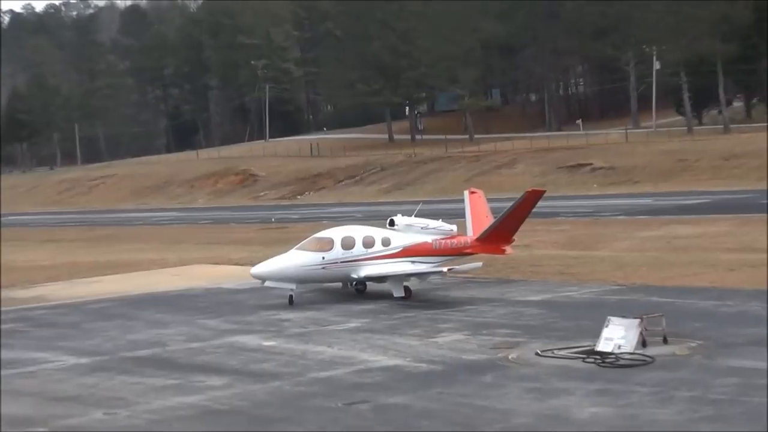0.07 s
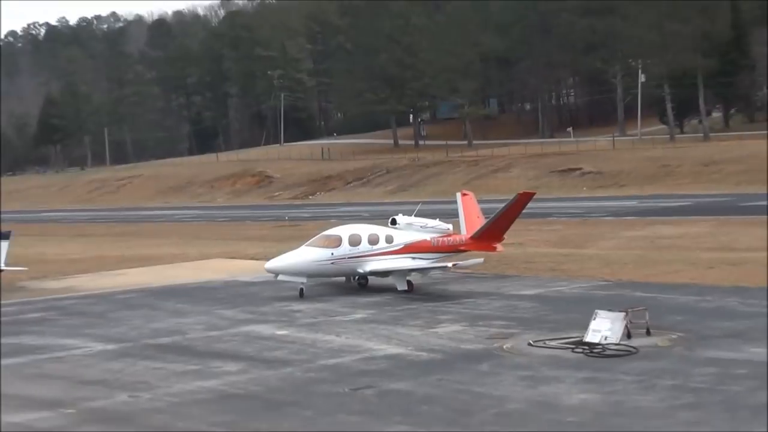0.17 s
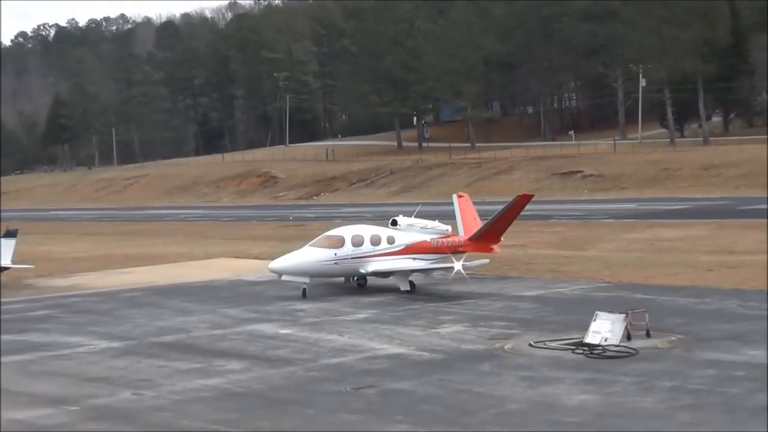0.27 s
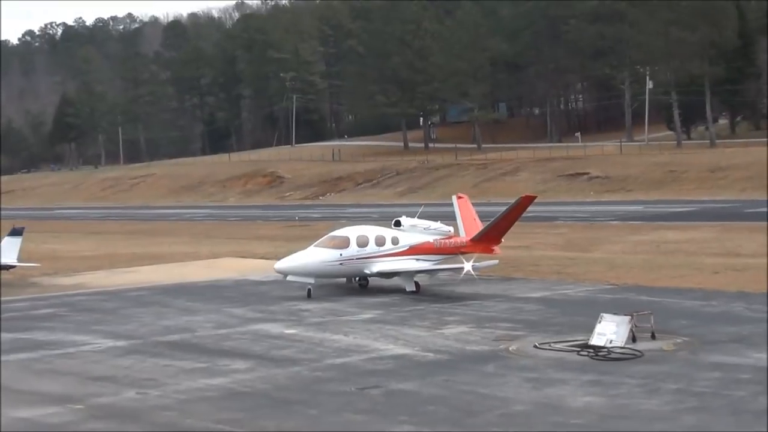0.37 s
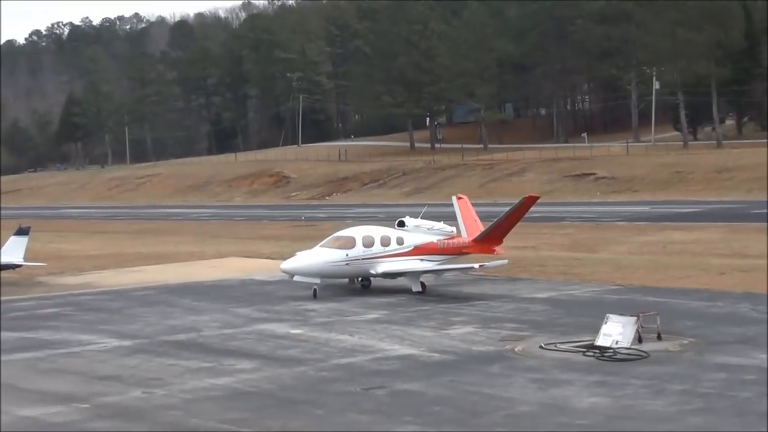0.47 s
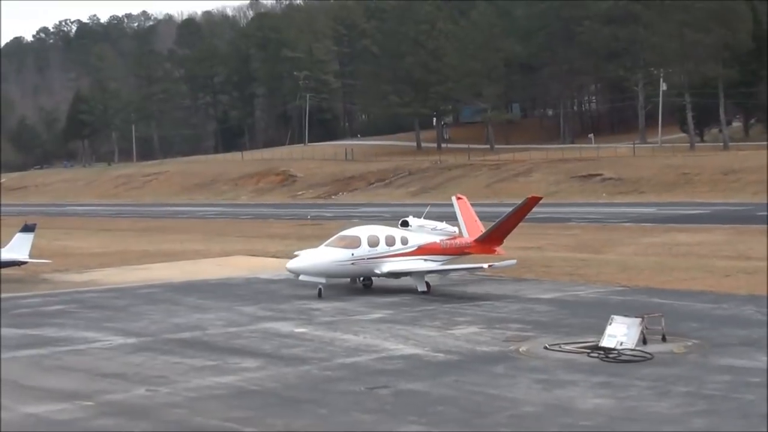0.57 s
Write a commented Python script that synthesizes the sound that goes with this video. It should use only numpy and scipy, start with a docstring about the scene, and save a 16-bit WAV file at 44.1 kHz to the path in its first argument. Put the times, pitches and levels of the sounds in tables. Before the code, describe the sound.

Small jet engine whining and rushing on an open ramp, fading in, then spooling up higher

```python
"""A small turbofan jet taxis across a concrete ramp; the sound fades in, then the engine spools up. The fan
sings in sine tones at orders of its shaft speed, and the core adds a whine and a difference tone below it. The
broad rush of intake and exhaust is stereo noise in bands that swell on their own, coloured by a short echo off
the airframe, a later one off the ground and that echo once more. The tones swell and fade as eddies in the air
between jet and microphones add stray paths."""
import sys
import numpy as np
from scipy import signal
from scipy.fft import rfft, irfft, next_fast_len
from scipy.io import wavfile
from scipy.ndimage import uniform_filter1d, map_coordinates

SR = 44100
rng = np.random.default_rng(int(sys.argv[2]) if len(sys.argv) > 2 else 0)


def store_wav(level_fs):
    """Save 16-bit WAV to argv[1]."""
    pcm = np.round(np.clip(np.atleast_2d(level_fs), -1, 1) * 32767)
    wavfile.write(sys.argv[1], SR, pcm.T.astype(np.int16))


N = 97637

# How alike the left and right sides are. Each row: frequency in Hz, correlation from 0 to 1.
SIDE_LIKENESS = [(30, .995), (160, .97), (450, 0.94), (1220, 0.88), (2010, 0.89), (3330, 0.66),
                 (5500, 0.57), (9080, 0.87), (11500, 1)]
# How the sound leans to the left. Each row: frequency in Hz, level of left over right in dB.
LEFT_LEAN = [(60, 0), (200, -.5), (450, 1), (740, 2.5), (1220, 3), (3330, 2), (5500, 3), (9080, .5),
             (11500, 0)]
# How far the left side leads the right. Each row: frequency in Hz, phase in radians.
LEFT_LEAD = [(30, 0), (200, -0.27), (690, -0.43), (2300, .1), (2700, 0.27), (3900, -0.085), (6100, -0.41),
             (9200, -0.43), (11500, 0)]
SIDES = np.array([[1], [-1]])   # left, right


def amp(db):
    """Decibels to gain."""
    return 10 ** (np.asarray(db) / 20)


def in_time(rows):
    """Columns of a table, after its first in seconds, as curves over the samples."""
    seconds, *columns = np.transpose(rows)
    t = np.arange(N) / SR
    return [np.interp(t, seconds, column) for column in columns]


def at_hz(points, hz):
    """Table value on a log-frequency axis."""
    point_hz, values = np.transpose(points)
    return np.interp(np.log(hz + 1), np.log(point_hz + 1), values)


def drift(rate_hz):
    """Slow noise of spread 1: white noise through two equal low-pass poles at the given rate."""
    step = 40   # samples between the slow values
    pole = np.exp(-2 * np.pi * rate_hz * step / SR)
    noise = rng.standard_normal(N // step + 2002)
    slow = signal.lfilter([1], [1, -2 * pole, pole * pole], noise)[2000:]   # past the settling
    return np.interp(np.arange(N) / step, np.arange(len(slow)), slow / slow.std())


def band_swells(sides, size, roar_db, rumble_db):
    """Third-octave bands of the rush swell separately, with a little swell in common."""
    own_swell_db, shared_swell_db = 1.5, 0.42
    roar_low_hz, roar_high_hz = 500, 2100
    hz = np.arange(size // 2 + 1) * SR / size
    place = 3 * np.log2(np.maximum(hz, 50) / 50)   # third-octaves above 50 Hz
    together = drift(6)
    out = 0
    for k in range(26):
        share = np.cos(np.pi / 2 * np.clip(place - k, -1, 1)) ** 2   # overlaps its neighbours
        centre_hz = 50 * 2 ** (k / 3)
        swell_db = shared_swell_db * together + own_swell_db * drift(11.6)
        if centre_hz < roar_low_hz:
            swell_db = swell_db + rumble_db
        elif centre_hz < roar_high_hz:
            swell_db = swell_db + roar_db
        out = out + amp(swell_db) * irfft(sides * share, size)[:, :N]
    return out


def ground_echoes(direct):
    """The ground returns a dulled copy, then once more at twice the lag, which shifts as the jet rolls."""
    # Delay of the first ground echo. Each row: time in seconds, delay in ms.
    ground_delay = [(.1, 4.25), (.5, 4.35), (.9, 4.65), (1.3, 4.8), (1.7, 4.72), (2.2, 4.4)]
    echo_gain, rebound_gain, dull_hz = 0.5, 0.24, 3240
    low_pass = signal.butter(1, dull_hz, fs=SR, output="sos")
    dull = signal.sosfiltfilt(low_pass, direct)
    lag = uniform_filter1d(in_time(ground_delay)[0], size=6000) * SR / 1000   # ms to samples
    out = direct
    for bounce, gain in ((1, echo_gain), (2, rebound_gain)):
        late = np.arange(N) - bounce * lag
        echo = [map_coordinates(side, [late], order=3, mode="nearest") for side in dull]
        out = out + gain * np.array(echo)
    return out


def rush(rush_db, roar_db, rumble_db):
    """Intake and exhaust turbulence: coloured stereo noise with echoes off the airframe and the ground."""
    # Colour of the rush before its echoes. Each row: frequency in Hz, relative level in dB per Hz.
    rush_colour = [(20, -47), (100, -31.5), (155, -15), (200, -22), (280, -18.5), (330, -9), (450, -18.5),
                   (560, -21), (615, -15), (740, -19), (880, -14.5), (1050, -12.5), (1280, -15), (1480, -6),
                   (1750, -11.5), (2050, -14.5), (2500, -11), (3300, -11.5), (4500, -15), (6500, -16.5),
                   (8000, -18.5), (10500, -16.5), (12500, -24), (14000, -30.5), (15600, -31)]
    near_echo_s, near_echo_gain, near_dull_hz = 0.001225, 0.3, 4660   # off the airframe
    size = next_fast_len(N)
    hz = np.arange(size // 2 + 1) * SR / size
    common, opposed = rfft(rng.standard_normal((2, size)))
    alike = np.clip(at_hz(SIDE_LIKENESS, hz), 0, 1)
    sides = np.sqrt(1 + alike) * common + SIDES * np.sqrt(1 - alike) * opposed
    sides = sides * amp(SIDES * at_hz(LEFT_LEAN, hz) / 2)
    sides = sides * np.exp(0.5j * SIDES * at_hz(LEFT_LEAD, hz))
    near_dulling = 1 / (1 + (hz / near_dull_hz) ** 2)
    near_echo = near_echo_gain * np.exp(-2j * np.pi * hz * near_echo_s) * near_dulling
    sides = sides * amp(at_hz(rush_colour, hz)) * (1 + near_echo)
    out = ground_echoes(band_swells(sides, size, roar_db, rumble_db))
    return amp(rush_db) * out / out.std()


def stray_paths(share=0.24, rate_hz=12):
    """Eddies add stray paths to the direct one; their interference makes a tone swell and fade."""
    paths = 1 + share * (drift(rate_hz) + 1j * drift(rate_hz))
    return np.abs(paths) / np.sqrt(1 + 2 * share ** 2)   # keeps the mean power


def tone(hz, level_db):
    """A sine that fades by interference, with a wandering phase gap between the two sides."""
    wander_rad, skew_rad = 0.24, 1   # spreads; the skew is for wholly unlike sides
    mean_hz = hz.mean()
    phase = 2 * np.pi * np.cumsum(hz) / SR + wander_rad * drift(20) + rng.uniform(0, 2 * np.pi)
    alike = np.clip(at_hz(SIDE_LIKENESS, mean_hz), 0, 1)
    gap = skew_rad * np.sqrt(1 - alike) * drift(5.9) + at_hz(LEFT_LEAD, mean_hz)
    lean = amp(SIDES / 2 * at_hz(LEFT_LEAN, mean_hz))
    peak = np.sqrt(2) * amp(level_db)   # the level is RMS
    return peak * lean * stray_paths() * np.sin(phase + SIDES / 2 * gap)


def fan_speed():
    """Shaft speed of the fan in revolutions per second, smoothed; it sags a little, then spools up."""
    # Fan shaft speed. Each row: time in seconds, revolutions per second.
    shaft_speed = [(.11, 159.67), (.42, 159.03), (.63, 158.56), (.96, 158.36), (1.19, 158.99),
                   (1.36, 160.49), (1.48, 162.17), (1.61, 164.58), (1.77, 168.25), (1.94, 172.56),
                   (2.09, 176.69), (2.22, 180.34)]
    return uniform_filter1d(in_time(shaft_speed)[0], size=4000)


def dropouts(order):
    """Brief dips in dB of one strong fan order, each a short bell."""
    # Each row: centre in seconds, fan order, depth in dB.
    dips = [(.64, 63, 10), (.825, 63, 12), (1.01, 63, 12), (1.165, 63, 10), (1.55, 63, 12), (1.74, 63, 14),
            (1.19, 47, 12), (1.86, 47, 12), (2.0, 47, 14), (1.16, 16, 10), (1.6, 16, 8), (1.96, 16, 8)]
    spread_s = 0.014
    t = np.arange(N) / SR
    return sum(depth_db * np.exp(-((t - centre_s) / spread_s) ** 2 / 2)
               for centre_s, k, depth_db in dips if k == order)


def fan_tones(speed, rush_db):
    """The fan sings at whole multiples (orders) of its shaft speed, some strong and some faint."""
    strong_orders = (16, 31, 47, 63, 79)   # multiples of the shaft speed
    # Strong tones. Each row: time in seconds, then levels in dB of orders 16, 31, 47, 63 and 79.
    strong_levels = [(0.12, -16.5, -28.0, -41, -19.5, -35.0), (0.21, -18.5, -20.5, -37, -26.5, -46.0),
                     (0.29, -13.5, -33, -39, -20.5, -42), (0.382, -18, -36, -24, -26.5, -33.0),
                     (0.47, -19.5, -39, -31.0, -17.5, -38.0), (0.55, -21, -38, -52.0, -16.5, -34),
                     (0.64, -21, -24, -26, -26.5, -44.0), (0.73, -29.0, -26.5, -32, -16, -48),
                     (0.82, -28, -30, -27, -25.0, -28), (0.9, -22, -34.5, -25, -20.5, -37),
                     (0.99, -20, -27.0, -31.0, -22, -30.0), (1.08, -21, -29.5, -29.0, -19.5, -27),
                     (1.16, -27, -28, -28, -22, -30), (1.248, -26.5, -26, -31, -20, -30),
                     (1.34, -29.5, -19.5, -42, -22.5, -32.0), (1.42, -28.5, -25.0, -18.5, -17.5, -34),
                     (1.51, -20, -31, -22, -20.5, -34), (1.6, -23.5, -34, -19.5, -20.5, -33.0),
                     (1.69, -23.5, -40, -19.5, -18.5, -38.0), (1.77, -25, -28, -23.5, -19, -50),
                     (1.86, -24.5, -30, -23, -23, -47.0), (1.95, -19, -31, -28, -44, -38),
                     (2.03, -33, -33, -28, -30, -33), (2.12, -25, -40.0, -22.5, -29, -34.0),
                     (2.21, -25, -25, -22.5, -26, -37)]
    # Faint tones. Each row: fan order, level in dB against the rush.
    faint_tones = [(32, -24), (48, -26), (64, -25), (80, -37), (95, -30)]
    out = 0
    for order, level_db in zip(strong_orders, in_time(strong_levels)):
        out = out + tone(order * speed, level_db - dropouts(order))
    for order, level_db in faint_tones:
        out = out + tone(order * speed, rush_db + level_db)
    return out


def core_tones(speed, rush_db):
    """The core whines at a pitch one blade rate of the fan above a fainter difference tone, which lies at the
    whine less the blade rate."""
    # Pitch of the difference tone, the core whine less the fan's blade rate. Each row: time in seconds,
    # frequency in Hz.
    difference_pitch = [(.1, 4838), (.6, 4835), (1, 4838), (1.3, 4875), (1.45, 4945), (1.6, 5000), (1.75, 5052),
                        (1.9, 5125), (2.1, 5190), (2.2, 5225)]
    # Each row: time in seconds, difference tone in dB against the rush, core whine in dB against the rush.
    core_levels = [(.1, -28, -16), (.35, -28, -17), (.7, -21, -20), (1, -24, -22), (1.15, -17, -34),
                   (1.4, -37, -13), (1.6, -18, -26), (1.75, -24, -22), (1.9, -23, -24), (2.2, -25, -27)]
    blades = 16
    difference_hz = uniform_filter1d(in_time(difference_pitch)[0], size=4000)
    difference_db, core_whine_db = in_time(core_levels)
    return tone(difference_hz, rush_db + difference_db) + tone(difference_hz + blades * speed, rush_db + core_whine_db)


def scene():
    """The rush and the whine of fan and core together."""
    # Each row: time in seconds, rush in dB, extra middle roar in dB, extra low rumble in dB.
    rush_levels = [(.1, -15, 1.5, 6.5), (.45, -18, 2.5, 4.5), (.8, -15, 0.5, -1.5), (1.2, -14, 1.5, -2.5),
                   (1.5, -14, 2.5, -2.5), (1.8, -13, 3, 0), (2.2, -13, 3.5, 0.5)]
    rush_db, roar_db, rumble_db = in_time(rush_levels)
    speed = fan_speed()
    whine = fan_tones(speed, rush_db) + core_tones(speed, rush_db)
    return rush(rush_db, roar_db, rumble_db) + whine


def record(dry):
    """Peaks are rounded, the sound fades in by even steps of gain, the top is cut."""
    ceiling, cutoff_hz = 2.3, 15750
    start_s, fade_steps, steps_per_s = 0.102, 30, 29.97
    soft = np.clip(ceiling * np.tanh(dry / ceiling), -1, 1)
    steps = np.floor((np.arange(N) / SR - start_s) * steps_per_s) + 1
    faded = soft * np.clip(steps / fade_steps, 0, 1)
    top_cut = signal.cheby2(16, 70, cutoff_hz, fs=SR, output="sos")
    return signal.sosfilt(top_cut, faded)


dry = scene()
out = record(dry)
store_wav(out)
```